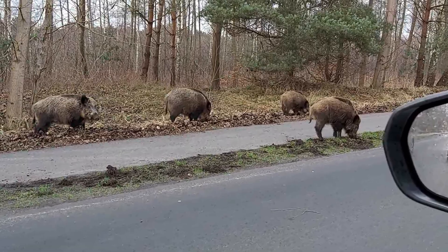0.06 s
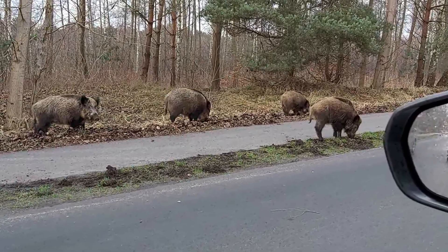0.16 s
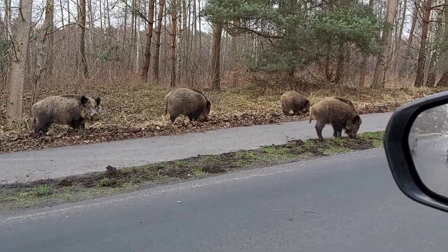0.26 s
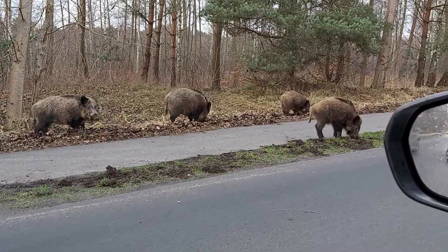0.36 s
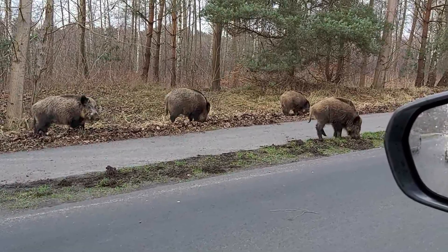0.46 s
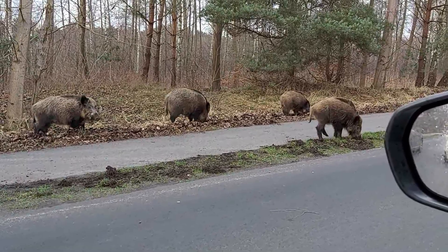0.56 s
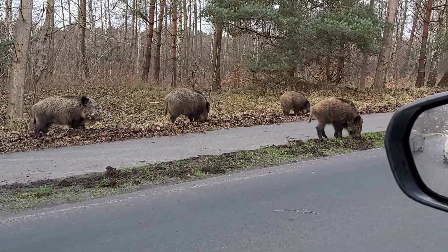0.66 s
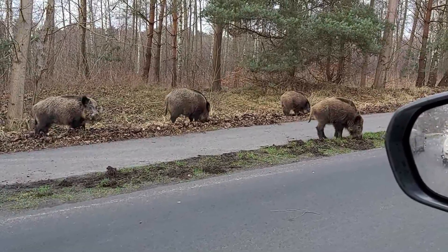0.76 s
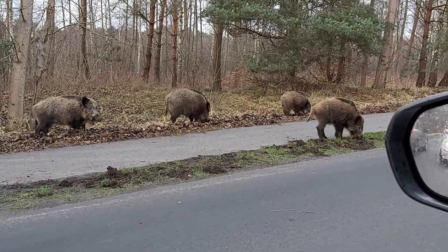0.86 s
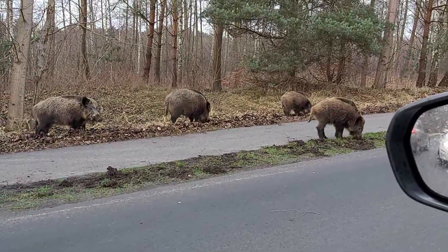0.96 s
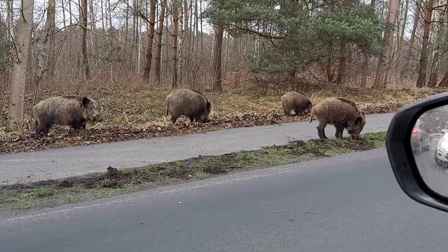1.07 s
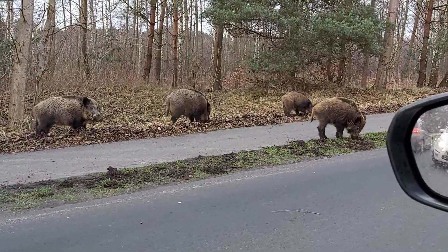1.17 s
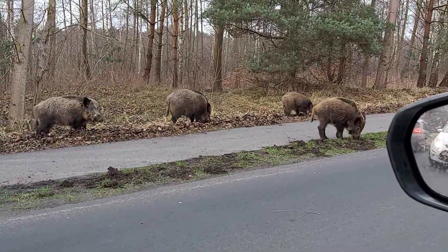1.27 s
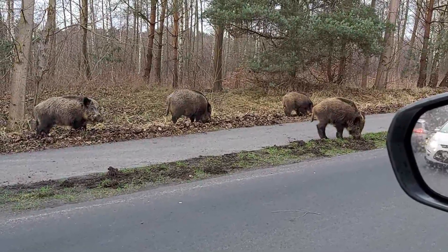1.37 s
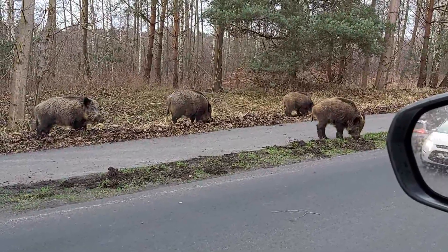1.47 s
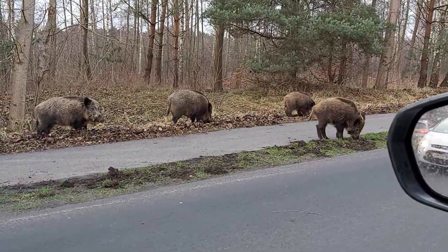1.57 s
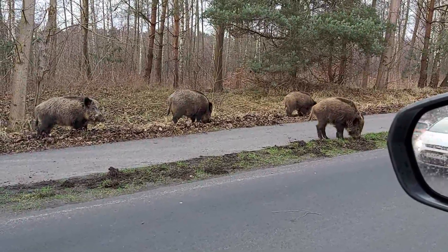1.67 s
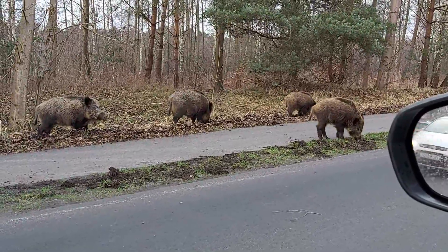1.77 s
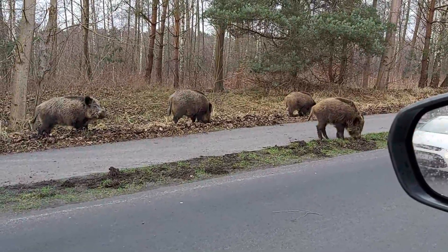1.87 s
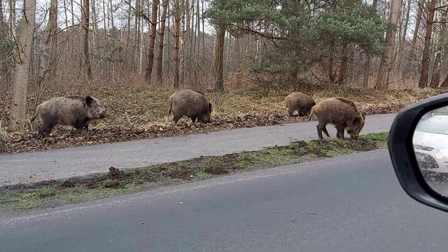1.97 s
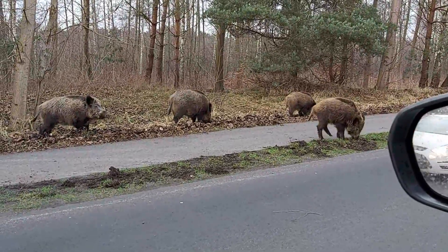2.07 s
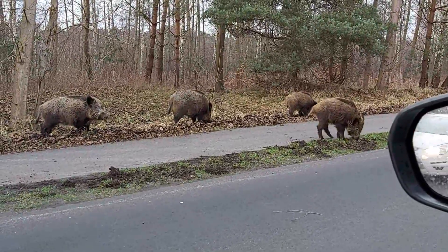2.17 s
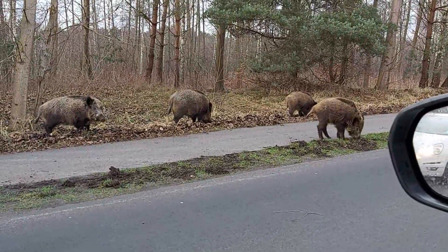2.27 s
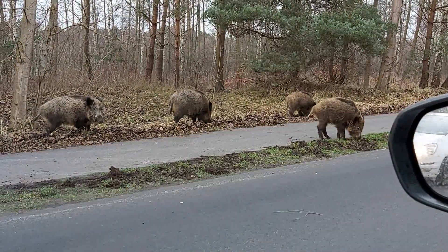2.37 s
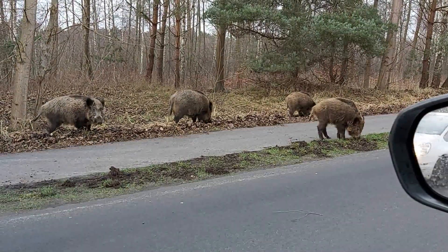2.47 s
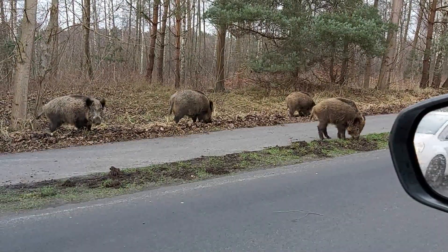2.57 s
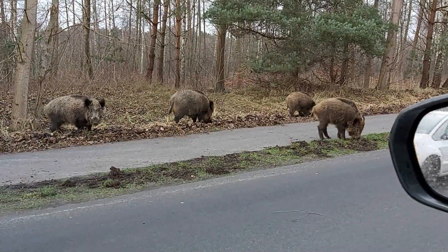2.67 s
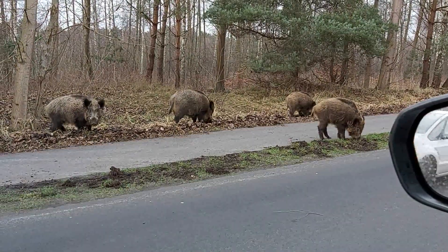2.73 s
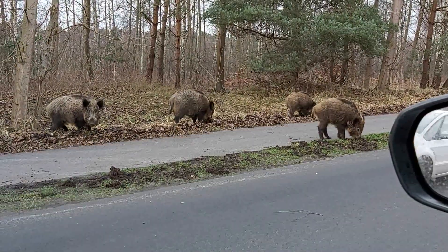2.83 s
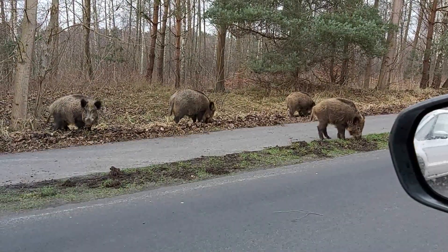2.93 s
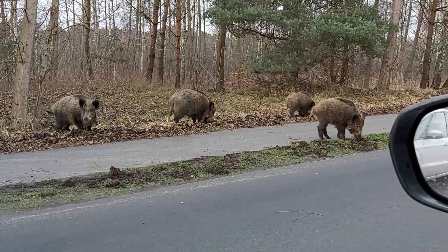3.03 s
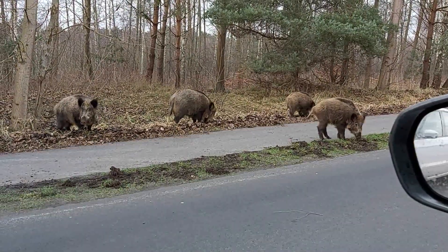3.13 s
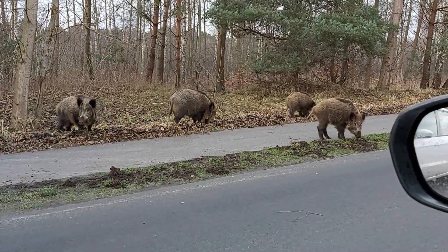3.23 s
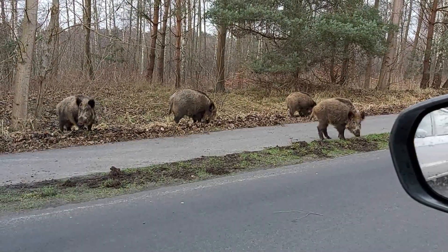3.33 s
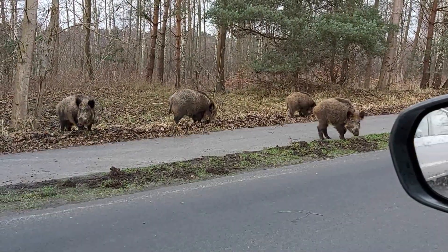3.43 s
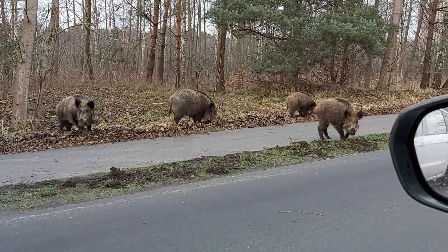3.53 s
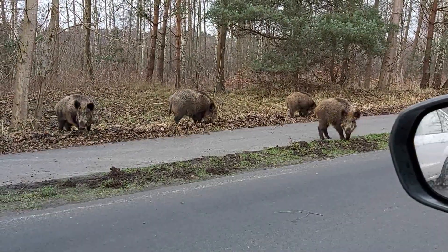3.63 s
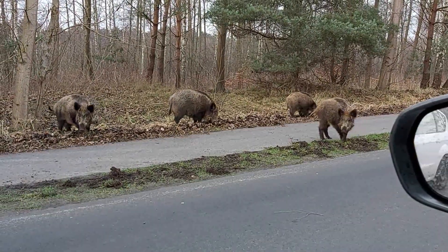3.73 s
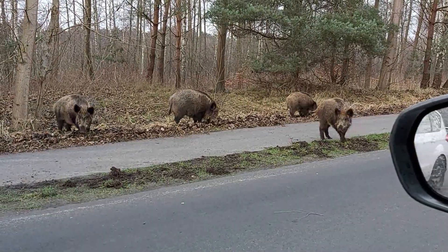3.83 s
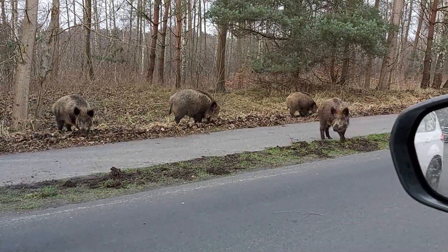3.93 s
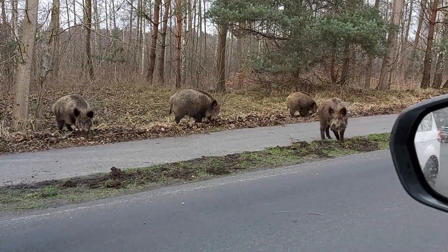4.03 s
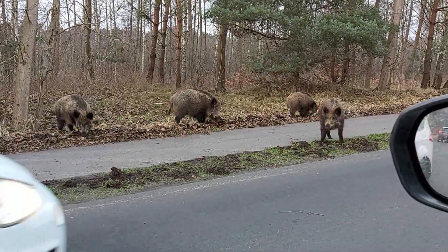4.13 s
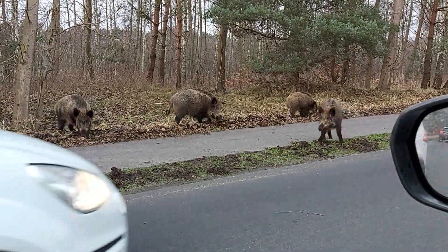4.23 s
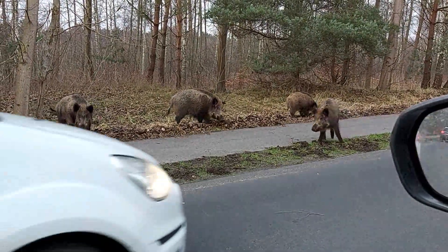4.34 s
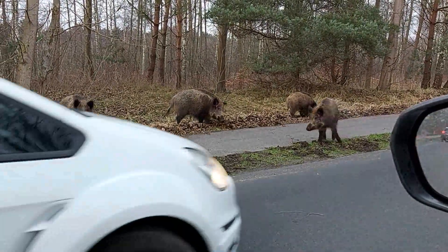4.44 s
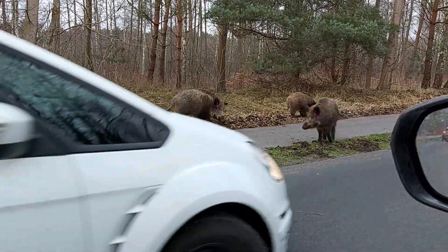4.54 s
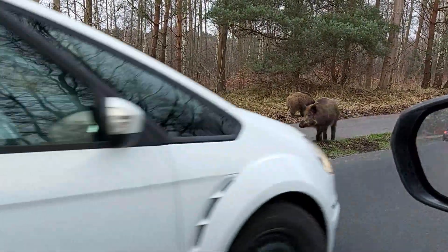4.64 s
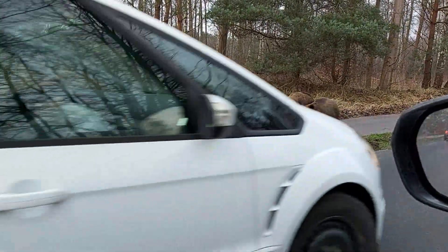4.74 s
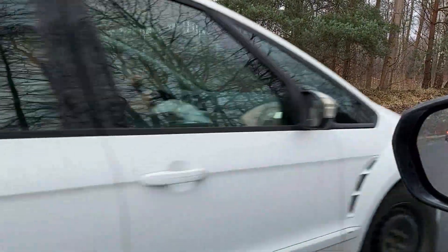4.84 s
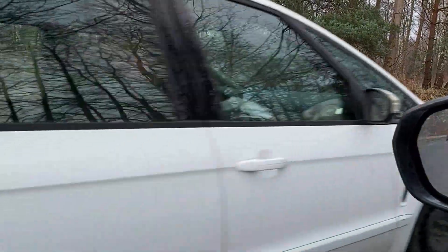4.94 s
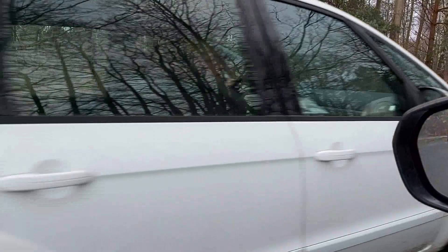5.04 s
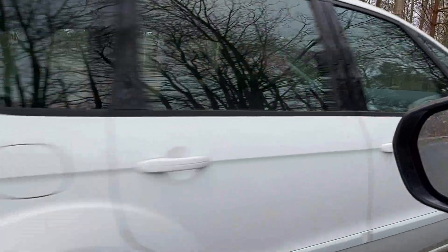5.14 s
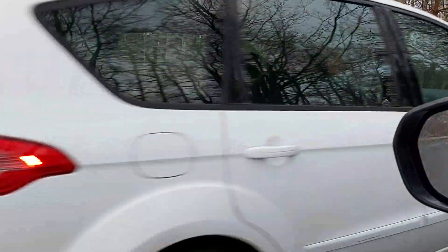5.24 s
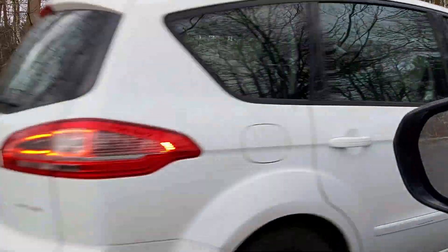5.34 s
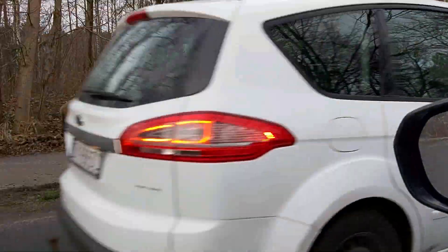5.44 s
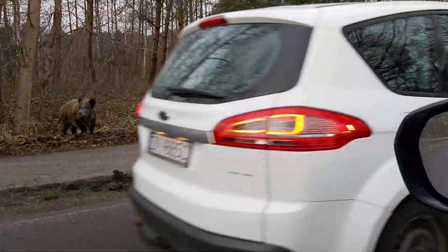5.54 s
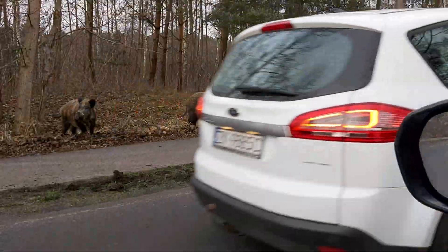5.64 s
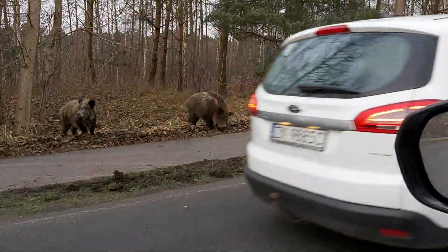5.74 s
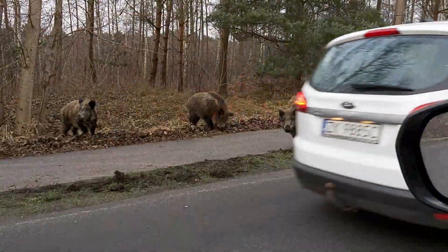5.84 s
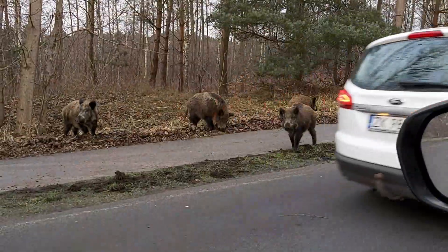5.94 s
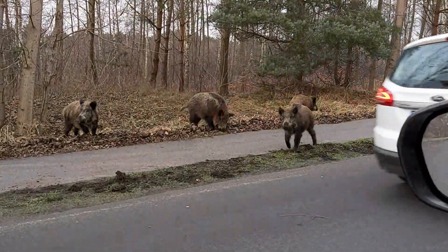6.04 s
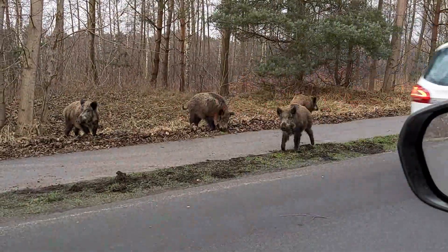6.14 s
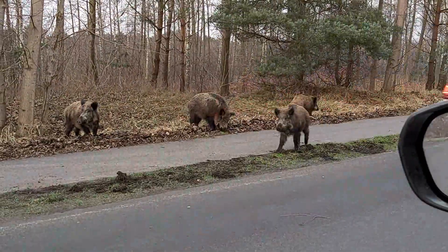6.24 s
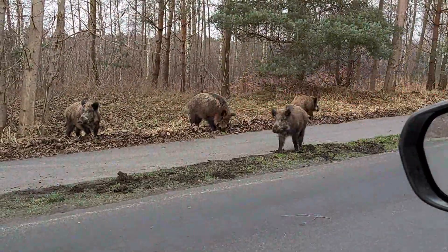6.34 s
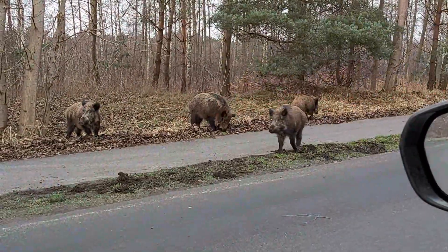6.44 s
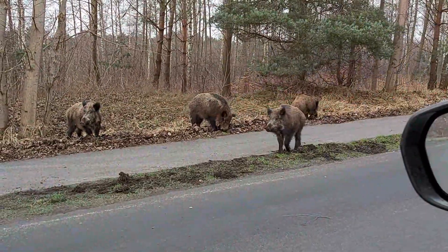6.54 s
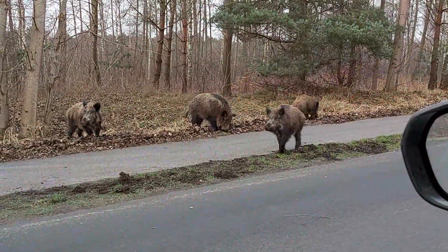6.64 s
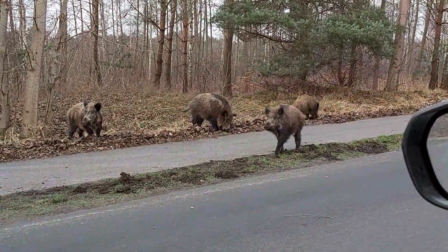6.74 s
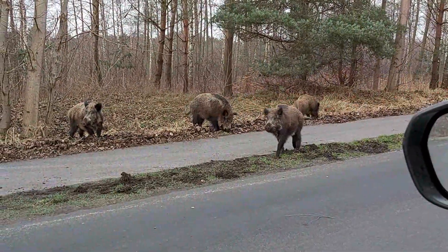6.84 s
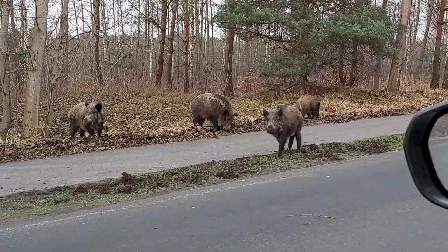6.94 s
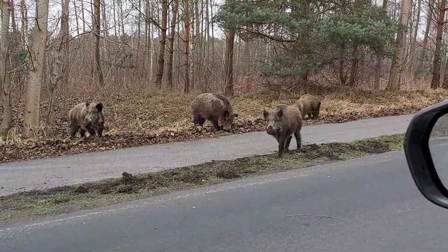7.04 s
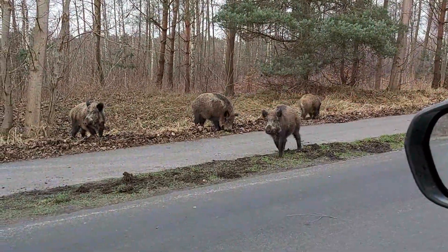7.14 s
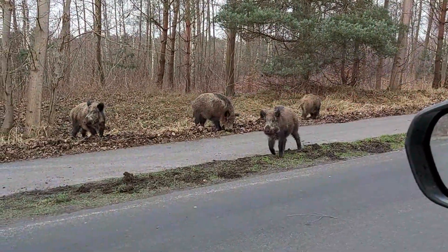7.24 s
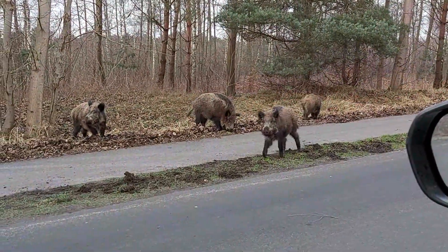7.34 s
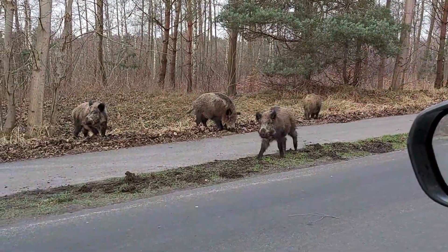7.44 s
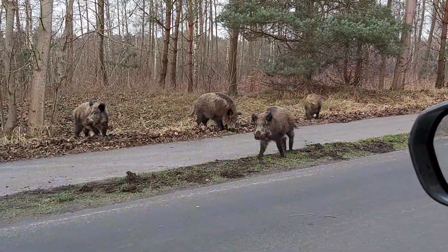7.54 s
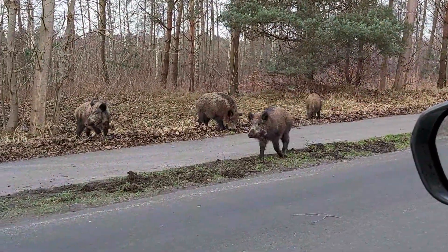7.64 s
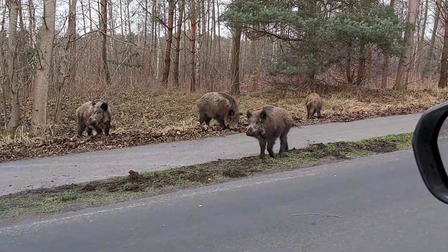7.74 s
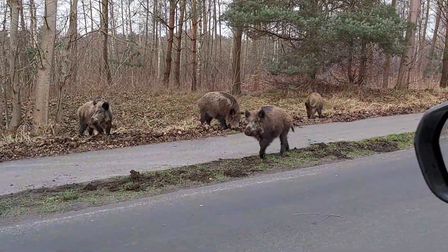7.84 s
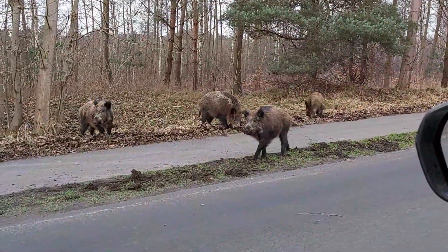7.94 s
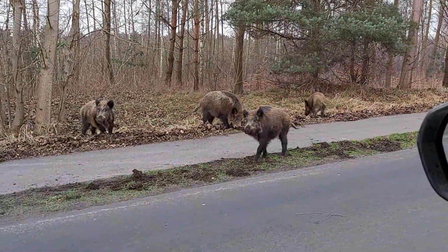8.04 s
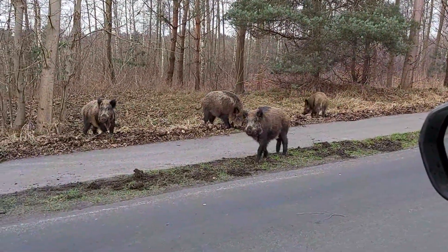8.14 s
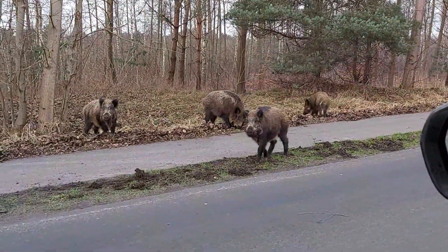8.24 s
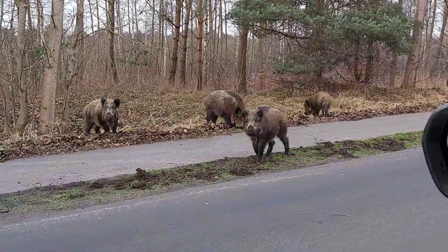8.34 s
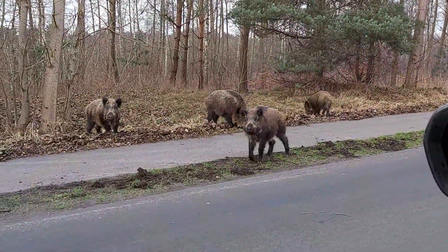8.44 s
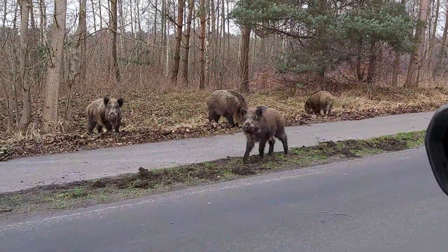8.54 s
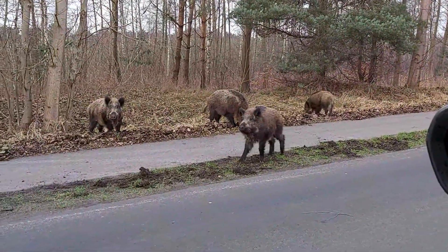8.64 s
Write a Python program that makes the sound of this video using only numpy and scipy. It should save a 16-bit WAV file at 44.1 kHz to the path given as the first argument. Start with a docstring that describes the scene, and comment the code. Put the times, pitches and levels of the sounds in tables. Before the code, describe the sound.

Inside a stopped car with its window open on a forest road, the engine idles in a low, fluttering hum. A diesel car approaches slowly from behind, booming and clattering, one cylinder knocking hard. It accelerates past at arm's length with roaring tyres and crunching grit, then fades with a thin turbo whistle, leaving the idle. Close stereo microphone at the window.

```python
"""A stopped car idles by a country road, heard through its open side window: steady hums and fluttering noise.
A four-cylinder diesel creeps up from behind. Each firing booms and clatters; one cylinder knocks hard.
First comes its engine bay, with short intake rasps, then the roar and crunch of tyres on the road.
It pulls past at arm's length, its echo sweeping in pitch, and a tyre bumps over a stone.
Its tail drives off with a faint turbo whistle. A few dry snaps come before and after it passes."""
import sys
import numpy as np
from scipy import signal
from scipy.fft import rfft, irfft
from scipy.io import wavfile
from scipy.ndimage import map_coordinates

SR = 44100
rng = np.random.default_rng(int(sys.argv[2]) if len(sys.argv) > 2 else 0)


def digitize_waveform(pressure):
    """Quantize a signal to 16-bit integers and store it at the path in sys.argv[1].

    Rows of a 2-D input are taken as channels; values are limited to [-1, 1].
    """
    field = np.atleast_2d(pressure).T
    bounded = np.clip(field, -1, 1)
    quanta = np.round(bounded * 32767).astype(np.int16)
    wavfile.write(sys.argv[1], SR, quanta)


N = 383669
TIME = np.arange(N) / SR  # seconds
BINS = np.fft.rfftfreq(N, 1 / SR)  # Hz


def amp(db):
    """Decibels to gain."""
    return 10 ** (np.asarray(db) / 20)


def curve(rows, axis=1):
    """One column of a table, joined by straight lines in time."""
    rows = np.array(rows)
    return np.interp(TIME, rows[:, 0], rows[:, axis])


def read(points):
    """A table over frequency, joined by straight lines on a log frequency axis."""
    hz, value = np.transpose(points)
    return np.interp(np.log(BINS + 1), np.log(hz + 1), value)


def drift(rate_hz):
    """A smooth random wander of rms about 1 that changes no faster than about rate_hz."""
    knots = rng.standard_normal(8192)
    return map_coordinates(knots, [TIME * 2 * rate_hz], order=2, mode="wrap")


# Balance of the two sides. Each row: frequency in Hz, left minus right in dB.
SIDE_BALANCE = [(100, -.7), (500, -1.2), (1000, -2.5), (1700, -1.2), (2800, 0), (5000, 0.1), (7500, 2),
                (10000, 5.5), (15000, 7.5)]
# How alike the two sides are, before each sound's own directness. Each row: frequency in Hz, likeness 0 to 1.
SIDE_LIKENESS = [(100, 0.65), (300, 0.66), (500, 0.37), (1000, 0.44), (1900, 0.5), (2800, 0.25),
                 (6000, 0.3), (9000, 0.14), (15000, .12)]


def noise(spectrum, lead_ms=0.36, left_db=0, direct=1):
    """Noise on both sides: the direct part reaches the left first if lead_ms is positive, the rest is diffuse."""
    a, b, c, d = rng.standard_normal((4, len(BINS)))
    same = np.clip(read(SIDE_LIKENESS) * direct, 0, .99)
    left = a + 1j * b
    # in the bass the cabin's air moves as a whole, so the lag fades out there
    lag_share = BINS ** 4 / (BINS ** 4 + 550. ** 4)
    lag = np.exp(-2j * np.pi * BINS * lead_ms / 1000 * lag_share)
    right = (same * left + np.sqrt(1 - same ** 2) * (c + 1j * d)) * lag
    tilt = amp(read(SIDE_BALANCE) + left_db * BINS ** 2 / (BINS ** 2 + 1000 ** 2))
    # fade out below the first and above the last frequency of the table
    low_skirt = 1 / (1 + (.8 * spectrum[0][0] / (BINS + 1)) ** 8)
    high_skirt = 1 / (1 + (BINS / spectrum[-1][0] / 1.3) ** 8)
    size = amp(read(spectrum)) * low_skirt * high_skirt * np.sqrt(N * SR / 2 / (1 + tilt ** 2))
    return irfft(np.array([left * tilt, right]) * size, N)


def bursts(cycles, decay):
    """A quick rise and a slower fall once in each cycle; decay is a share of the cycle."""
    age = (cycles % 1) / decay
    return age * np.exp(1 - age)


def throb(pulses, depth):
    """A gain of rms 1 that follows the pulses."""
    gain = 1 + depth * pulses
    return gain / np.sqrt(np.mean(gain ** 2))


def whistle(hz, width_hz):
    """A fuzzy tone of rms about 1 on a steady or moving pitch."""
    angle = 2 * np.pi * np.cumsum(hz * np.ones(N)) / SR
    return drift(width_hz) * np.cos(angle) + drift(width_hz) * np.sin(angle)


# The diesel's speed. Each row: time in seconds, firings a second.
FIRING_RATE = [(0, 35.2), (.55, 38.8), (.9, 41.8), (1.25, 37.1), (1.6, 34.3), (2.3, 33.2), (2.8, 34.2),
               (3.15, 37.6), (3.65, 38.2), (4, 44.8), (4.35, 45.4), (4.7, 51.3), (5, 56), (5.3, 57.4),
               (5.65, 62), (6, 57.9), (7.2, 54.5), (8.7, 52.2)]
# Strength of each cylinder's clatter: one number for each cylinder.
CYLINDER_STRENGTH = [0.76, 0.53, 0.52, 0.57]


def engine_firings():
    """Running count of engine cycles, and a pulse for each firing as strong as its cylinder."""
    cylinders = len(CYLINDER_STRENGTH)
    cycles = .42 + np.cumsum(curve(FIRING_RATE)) / cylinders / SR
    firings = cylinders * cycles
    strength = np.array(CYLINDER_STRENGTH)[firings.astype(int) % cylinders]
    return cycles, strength * bursts(firings, decay=0.35)


# it stays in one gear, so each firing moves it on by the same distance
METRES_PER_FIRING, ABREAST_S = .06, 4.64


def travel():
    """Metres that the diesel has gone beyond the window; negative while it is still behind."""
    metres = METRES_PER_FIRING * np.cumsum(curve(FIRING_RATE)) / SR
    return metres - metres[round(ABREAST_S * SR)]


# How each part of the diesel sweeps past the window. Each named row: metres beyond abreast where
# it is loudest, gain there in dB, half-width in metres, then the fall in dB per doubling of
# distance while coming and while going. The "overtones" gain is the level of their strongest lines.
PASSES = { "bay": (-2, -0.5, 2, 7, 16), "intake": (-2.5, -4.5, 1.7, 4.5, 3),
          "rumble": (0.42, 3.8, 2.1, 8.4, 12), "front tyre": (-1.0, 1, 1.0, 35, 9.5),
          "tyres": (0.5, -2, 2.5, 16.5, 17.5), "overtones": (2, -46.5, 2.5, 3, 13),
          "turbo hiss": (0.9, 5.8, 1.14, 24, 11.4), "tail": (1.52, .2, 2.45, 26, 9.1)}


def sweep(road, at_m, db, width_m, coming_db, going_db):
    """Gain of one part of the car: it falls with distance, at one rate while coming and another while going."""
    doublings = np.log2(np.hypot(1, (road - at_m) / width_m))
    return amp(db - doublings * np.where(road < at_m, coming_db, going_db))


# The boom from the grille and the underbody, before load and drone.
# Each row: multiple of the firing rate, then the five columns of PASSES with the level as rms dB.
BOOM_LINES = [(1, -1.4, -29.5, 0.89, 14, 8.7), (2, -2.5, -29.5, 0.64, 9.8, 6.4),
              (3, -1.7, -32, 0.81, 12, 6.4), (4, -0.5, -35.5, 1.19, 5.1, 10),
              (6, -1.9, -43.5, 1.6, 5.6, 6.9), (7, 1, -44.5, 2, 3.8, 8.5), (8, -3, -46.5, 0.99, 7.3, 9),
              (1, 0, -30, 0.5, 12, 5.3), (2, 0.2, -24, 0.9, 8.3, 4.48), (3, 0, -31, 0.36, 16, 6.2),
              (7, 0.5, -38, 0.29, 18, 10)]
# The throttle: a dab, a pause, then a long pull. Each row: time in seconds, load in dB.
THROTTLE_LOAD = [(0, 2), (.8, 3), (1.5, -6), (2.2, -13.5), (2.7, -5.5), (3.4, -0.5), (5.6, -0.5), (6.2, -3)]
BOOM_PER_LOAD = 0.15  # dB of boom for each dB of load
# resonance of the air intake, which faces forward
DRONE_HZ, DRONE_WIDTH_HZ, DRONE_DB = 155.4, 8.4, 12


def diesel_boom(cycles, road):
    """Each firing is a short dip of pressure; the intake drones on one pitch, uneven cylinders add weak half lines."""
    firings = 4 * cycles - .35
    rate, facing = curve(FIRING_RATE), np.clip(-road, 0, 1)
    boom = np.zeros(N)
    for order in sorted({round(row[0]) for row in BOOM_LINES}):
        paths = [path for multiple, *path in BOOM_LINES if round(multiple) == order]
        power = sum(sweep(road, *path) ** 2 for path in paths)
        unsteady = 1 + .04 * drift(4.)
        closeness = 1 / (1 + ((order * rate - DRONE_HZ) / DRONE_WIDTH_HZ) ** 2)
        drone = amp(DRONE_DB * facing * closeness)
        boom -= np.sqrt(power) * drone * unsteady * np.cos(2 * np.pi * order * firings)
    halves = range(9, 29)  # counted in halves of the firing rate
    overtones = np.zeros(N)
    for k in halves:
        unsteady = 1 + 0.24 * drift(2.5)
        strength = amp(-8. * (k % 2)) * (halves[0] / k) ** 0.63  # odd halves are weaker
        overtones += unsteady * strength * np.sin(np.pi * (k * firings + 2 * rng.random()))
    boom += sweep(road, *PASSES["overtones"]) * overtones
    load = amp(BOOM_PER_LOAD * curve(THROTTLE_LOAD))
    return np.sqrt(2) * boom * load * amp([[-.3], [.3]])


# Noise of the engine bay, the intake and the tail, before each one's sweep.
# Each row: frequency in Hz, level in dB per Hz.
BAY_NOISE = [(190, -58.5), (340, -58), (550, -72.5), (760, -76), (1020, -65.5), (1650, -76), (2250, -78),
             (2600, -82), (3000, -81.5), (3600, -80.5), (4800, -84), (6200, -86), (7600, -78.5),
             (9300, -94.5), (12000, -94), (15500, -97)]
INTAKE_NOISE = [(1200, -87), (1410, -67), (1650, -68.5), (1850, -70), (2200, -78)]
TAIL_NOISE = [(190, -80), (450, -66), (560, -68), (850, -62.5), (1250, -72), (1600, -70), (2200, -74.5),
              (2800, -78.5), (4500, -86.5), (6300, -85.5), (7600, -76), (8800, -89), (11300, -91.5),
              (15500, -94)]
# Intake resonances that whine under load and sing out just before the bonnet arrives.
# Each row: frequency in Hz, width in Hz, then the five columns of PASSES, before load and side balance.
INTAKE_WHINES = [(1434, 45, -1.4, -45, 0.42, 3.6, 8.4), (1572, 30, -2, -46.5, 0.56, 8.9, 10),
                 (1830, 30, -2, -49, 1, 4.6, 10)]
# A sizzle from the engine bay. Its one row: frequency in Hz, width in Hz,
# then the five columns of PASSES, before load.
BAY_SIZZLE = (6150, 229.5, -0.9, -45, 1.46, 9, 22)


def diesel_clatter(pulses, road):
    """Firings throw bursts of noise from the bay and the tail; bay and intake follow the throttle."""
    bay = noise(BAY_NOISE, lead_ms=0.52, left_db=1.5, direct=2.2)
    bay = bay * sweep(road, *PASSES["bay"]) * throb(pulses, depth=0.44)
    intake = noise(INTAKE_NOISE, lead_ms=0.59, left_db=-3.0, direct=1.27)
    intake = intake * sweep(road, *PASSES["intake"]) * amp(2. * drift(13.0))
    whines = sum(whistle(hz, width_hz) * sweep(road, *path) for hz, width_hz, *path in INTAKE_WHINES)
    whines = whines * amp([[-5.], [3.]])
    tail = noise(TAIL_NOISE, lead_ms=-0.24, left_db=7.5, direct=1.0)
    tail = tail * sweep(road, *PASSES["tail"]) * throb(pulses, depth=0.45)
    hz, width_hz, *path = BAY_SIZZLE
    sizzle = np.array([whistle(hz, width_hz) for side in range(2)]) * sweep(road, *path)
    return (bay + intake + whines + sizzle) * amp(curve(THROTTLE_LOAD)) + tail


# Knocks of the diesel. Each row: time in seconds, force in dB.
KNOCK_BLOWS = [(1.201, -23), (1.311, -23), (1.422, -21), (1.536, -20), (1.651, -28), (1.773, -25),
               (2.004, -21), (2.13, -25), (2.249, -23), (2.366, -21), (2.482, -22), (2.598, -18),
               (2.722, -20), (2.834, -15.5), (2.947, -12.5), (3.054, -7.5), (3.164, -8), (3.27, -8),
               (3.37, -7), (3.476, -7.5), (3.582, -6), (3.683, -4.5), (3.786, -10), (3.88, -3),
               (3.973, -3.5), (4.06, -2), (4.156, -6), (4.234, -4.5), (4.329, -3.5), (4.413, -2.5),
               (4.583, -2), (4.736, -3), (4.815, -8), (4.884, -0.5), (4.958, -4), (5.032, -0.5),
               (5.103, -.5), (5.168, -.5), (5.241, -5), (5.309, -2.5), (5.379, -2.5), (5.447, -3),
               (5.512, -5), (5.576, -9.5), (5.642, -7.5), (5.707, -10), (5.772, -8.5), (5.838, -10),
               (5.911, -13), (6.117, -14.5), (6.76, -25), (6.83, -24), (6.97, -17.5), (7.27, -23),
               (7.41, -24)]
# Metal contacts within one knock. Each row: time in ms from the knock's own time, strength.
KNOCK_CONTACTS = [(-7.5, 0.45), (-2.4, 1.08), (4, 0.55)]
# Colour of the knock from ahead and from beside, before force. Each row: frequency in Hz, level in dB per Hz.
KNOCK_AHEAD = [(900, -63), (1700, -61.5), (2200, -66.5), (2550, -60.5), (3050, -82), (3350, -61),
               (3570, -65.5), (3850, -71), (4400, -70.5), (6000, -72.5), (7400, -68.5), (9200, -102),
               (12000, -86), (15500, -98)]
KNOCK_BESIDE = [(700, -91), (1500, -57), (2100, -72), (2700, -59), (3200, -72), (5200, -75.5),
                (7400, -67.5), (9200, -82.5), (11400, -78), (15500, -90)]
CONTACT_SCATTER_MS, KNOCK_DECAY_S = 0.55, 0.012
KNOCK_TURN_AT_M, KNOCK_TURN_M = -0.18, 2  # where, and over what distance, it turns from ahead to the side
BLOCK_HZ, BLOCK_WIDTH_HZ, BLOCK_DB = 3610, 99, -40.5  # ring of the engine block, before force
BLOCK_HIDDEN_AT_M, BLOCK_HIDDEN_M = -1.1, 0.55  # where, and how gradually, the wing hides that ring


def diesel_knock(road):
    """One cylinder knocks much harder: a quick rattle of metal contacts, heard from ahead and then from the side."""
    power, age = np.zeros(N), np.arange(4096) / SR
    scatter = rng.standard_normal((len(KNOCK_BLOWS), len(KNOCK_CONTACTS)))
    for (s, db), slips in zip(KNOCK_BLOWS, scatter):
        for (ms, share), slip in zip(KNOCK_CONTACTS, slips):
            start = round((s + (ms + CONTACT_SCATTER_MS * slip) / 1000) * SR)
            power[start:][:len(age)] += (share * amp(db) * np.exp(-age / KNOCK_DECAY_S)) ** 2
    beside = np.clip(.5 + (road - KNOCK_TURN_AT_M) / KNOCK_TURN_M, 0, 1)
    beside = np.clip(beside + .2 * drift(9.), 0, 1)  # no two knocks have quite the same colour
    ring = whistle(BLOCK_HZ * (1 + .015 * drift(6.)), BLOCK_WIDTH_HZ) * amp(BLOCK_DB + 1.5 * drift(13.0))
    ring = ring / (1 + np.exp((road - BLOCK_HIDDEN_AT_M) / BLOCK_HIDDEN_M))
    ahead = noise(KNOCK_AHEAD, lead_ms=0.514, left_db=0.0, direct=0.86) + ring
    side = noise(KNOCK_BESIDE, lead_ms=-0.13, left_db=6.5)
    return (ahead * np.sqrt(1 - beside) + side * np.sqrt(beside)) * np.sqrt(power)


# Brief rasps of the intake as the throttle opens. Each row: middle in seconds, length in seconds,
# frequency in Hz, width in Hz, level in dB before the side balance.
RASP_GULPS = [(3.411, 0.026, 1830, 30, -38), (3.487, 0.022, 1420, 80, -36.5),
              (3.63, 0.2, 1634, 110.3, -39.5)]


def intake_rasps():
    """Gulps of air set the intake singing for a moment, louder on the right."""
    out = np.zeros(N)
    for s, length, hz, width_hz, db in RASP_GULPS:
        window = 1 / (1 + ((TIME - s) / (length / 2)) ** 8)
        out += whistle(hz, width_hz) * amp(db) * window
    return out * amp([[-4.], [2.5]])


GRIT_PER_S, GRIT_STRENGTH, GRIT_DECAY_S = 220, 1.0, .0013


def crunch():
    """A gain of rms 1 that jumps whenever a grain of grit snaps under the tread."""
    snaps = (rng.random(N) < GRIT_PER_S / SR) * np.minimum(rng.exponential(1, N), 3)
    keep = np.exp(-1 / (GRIT_DECAY_S * SR))
    power = 1 + GRIT_STRENGTH * signal.lfilter([1], [1, -keep], snaps)
    return np.sqrt(power / power.mean())


# The front tyre's roar, thrown forward from where tread meets road, and the rolling of all the tyres,
# before each one's sweep. Each row: frequency in Hz, level in dB per Hz.
FRONT_TYRE_ROAR = [(380, -80), (470, -66.5), (620, -59.5), (800, -69), (1030, -61.5), (1250, -66),
                   (1480, -64), (1750, -83), (2300, -76), (3000, -77)]
TYRE_ROLL = [(190, -63), (450, -63.5), (800, -62), (1050, -61.5), (1250, -65), (1520, -59), (2200, -72),
             (2700, -71.5), (3200, -73.5), (6200, -71.5), (7600, -75), (9300, -84), (11600, -77.5),
             (15500, -83)]
# Hums of the tyre tread. Each row: frequency in Hz, width in Hz, then the five columns of PASSES.
TREAD_HUMS = [(551.5, 42, 1.7, -35, 1.8, 21, 11.6), (595, 24, 1.9, -46.5, 0.76, 19, 4.3),
              (660, 22, 4.4, -46.5, 0.85, 14, 2.9)]


def tyres(pulses, road):
    """The front tyre roars first; then all four crunch on grit, with the engine's throb in their noise."""
    front = noise(FRONT_TYRE_ROAR, lead_ms=0.4, left_db=7.0, direct=0.82) * sweep(road, *PASSES["front tyre"])
    grit = crunch() * amp(.6 * drift(12.))
    roll = noise(TYRE_ROLL, lead_ms=0.399, left_db=0.5, direct=0.45) * sweep(road, *PASSES["tyres"])
    # the rolling noise pulses with each firing of the engine
    roll = roll * grit * throb(pulses, depth=0.3)
    hums = sum(whistle(hz, width_hz) * sweep(road, *path) for hz, width_hz, *path in TREAD_HUMS)
    return front + roll + hums


# the bounce off the road and the cars' flanks is longest when the cars are side by side
BOUNCE_FAR_MS, BOUNCE_EXTRA_MS, BOUNCE_AT_M, BOUNCE_WIDTH_M = 0.492, 2.342, 0.53, 1.76


def bounced(x, road, gain):
    """Adds an echo whose path changes as the car moves: a comb that sweeps down and up again."""
    delay_ms = BOUNCE_FAR_MS + BOUNCE_EXTRA_MS / np.hypot(1, (road - BOUNCE_AT_M) / BOUNCE_WIDTH_M)
    late = np.arange(N) - delay_ms * SR / 1000
    echo = np.array([np.interp(late, np.arange(N), side) for side in x])
    return (x + gain * echo) / np.sqrt(1 + gain ** 2)


# A tyre bumps over a stone. Its one row: start in seconds, level in dB before the decay,
# frequency in Hz, decay in seconds.
STONE_BUMP = (5.6111, -22, 660, .0026)


def bump():
    """A stone under the tread makes the tyre ring for two or three cycles."""
    s, db, hz, decay_s = STONE_BUMP
    age = np.maximum(TIME - s, 0)
    return -amp(db) * np.exp(-age / decay_s) * np.sin(2 * np.pi * hz * age)


# Hiss of the turbocharger as the front wheel arch goes by, before its sweep.
# Each row: frequency in Hz, level in dB per Hz.
ARCH_HISS = [(9800, -103), (10800, -82.5), (11400, -80), (12300, -100), (13500, -105)]
# The turbo whistle as it spools up, fades and briefly returns.
# Each row: time in seconds, pitch in Hz, level in dB before the side balance.
TURBO_WHISTLE = [(4.8, 9330, -92), (5.3, 9900, -72), (5.85, 10950, -59), (6.15, 11200, -67),
                 (6.55, 11380, -79), (6.86, 11150, -83), (6.98, 10880, -76), (7.45, 10820, -81),
                 (7.9, 10700, -95)]


def turbo(road):
    """A band of hiss from close by, then a thin whistle as the car draws away."""
    hiss = noise(ARCH_HISS, left_db=14.0) * sweep(road, *PASSES["turbo hiss"])
    thin = whistle(curve(TURBO_WHISTLE), width_hz=110.0) * amp(curve(TURBO_WHISTLE, axis=2))
    return hiss + thin * amp([[1.5], [-7.]])


IDLE_HZ = 27.29  # crankshaft turns a second, before a slight wander
# Hum of the idling engine. Each row: multiple of its crankshaft speed, rms level in dB
# before the slow change in level and the side balance.
IDLE_HUM = [(1, -49.5), (2, -35.5), (3, -41), (4, -43.5), (5, -52.5), (6, -49.5), (7, -51), (8, -53.5),
            (9, -52), (10, -52), (11, -56), (12, -65.5), (13, -62)]
# Slow rise and fall in level of the low hum, partly where it beats against the diesel's.
# Each row: time in seconds, gain in dB.
IDLE_HUM_LEVEL = [(0, 0), (.8, 0), (2, -5), (2.7, 0.5), (4, -2.5), (7.5, 1.5), (8.1, -3)]
# Noise of the idling engine. Each row: frequency in Hz, level in dB per Hz.
IDLE_ENGINE_NOISE = [(190, -61), (330, -66), (450, -72), (580, -68.5), (760, -74), (1000, -76.5),
                     (1220, -77.5), (1600, -79), (2200, -90.5), (2600, -88), (3100, -95), (3700, -95.5),
                     (5000, -96.5), (7600, -95.5), (9300, -111), (11300, -108), (15500, -121)]


def idling_car():
    """Crankshaft orders that slowly rise and fall in level, and engine noise that flutters with each turn."""
    turns = np.cumsum(IDLE_HZ * (1 + .0017 * drift(3.))) / SR
    hum = np.zeros(N)
    for order, db in IDLE_HUM:
        unsteady = 1 + .02 * order * drift(1.2)
        hum += np.sqrt(2) * amp(db) * unsteady * np.sin(2 * np.pi * (order * turns + rng.random()))
    hum = hum * amp(curve(IDLE_HUM_LEVEL)) * amp([[-1.7], [1.4]])
    flutter = throb(bursts(turns, decay=.22), depth=.22)
    return hum + noise(IDLE_ENGINE_NOISE, lead_ms=0.484, left_db=0.5) * flutter


# Low rumble in the cabin, before its gain. Each row: frequency in Hz, level in dB per Hz.
CABIN_RUMBLE = [(15, -91), (28, -80), (40, -58.5), (75, -56), (140, -58.5), (180, -66.5), (200, -65),
                (300, -130)]
CABIN_DB = -2  # gain of the part that is always there


def cabin_rumble(road):
    """Low noise that both cars raise in the cabin: a steady part, and one that grows as the diesel passes."""
    return noise(CABIN_RUMBLE) * np.hypot(amp(CABIN_DB), sweep(road, *PASSES["rumble"]))


# Small snaps of trim and grit. Each row: start in seconds, peak in dB, centre in Hz, width in octaves.
SNAPS = [(1.048, -37, 3100, 2.5), (1.773, -43, 2520, .3), (7.0064, -41, 3100, 2.2),
         (7.7014, -44, 3100, 2.5)]


def ticks():
    """Short dry snaps: fast-fading noise, each in its own band."""
    out = np.zeros((2, N))
    age = np.arange(2048) / SR
    for s, db, hz, octaves in SNAPS:
        edges = np.minimum(hz * 2 ** (np.array([-.5, .5]) * octaves), .45 * SR)
        band = signal.butter(3, edges, "bandpass", fs=SR, output="sos")
        snap = signal.sosfilt(band, rng.standard_normal((2, len(age))) * np.exp(-age / 0.0056))
        out[:, round(s * SR):][:, :len(age)] += amp(db) * snap / abs(snap).max()
    return out


def scene():
    """The passing diesel, the idling car, the cabin's rumble and the small snaps."""
    road = travel()
    cycles, pulses = engine_firings()
    passing = bounced(diesel_clatter(pulses, road) + tyres(pulses, road), road, gain=.27)
    diesel = diesel_boom(cycles, road) + diesel_knock(road) + passing
    diesel = diesel + intake_rasps() + turbo(road) + bump()
    return diesel + idling_car() + cabin_rumble(road) + ticks()


# Reflections from the window frame: one list for the left and one for the right.
# Each row: delay in ms, gain before the bass is taken out.
FRAME_ECHOES = [
    [(.45, 0.054), (1.66, 0.076), (3.1, 0.012)],
    [(.59, 0.14), (1.25, 0.018), (2.6, 0.022)],
]
# Colour of the window opening. Each row: frequency in Hz, gain in dB.
OPENING_COLOUR = [(560, 0), (700, -1.3), (800, 0), (980, 0.5), (1100, 0.7), (1290, -1), (1500, 0.1),
                  (2000, 0), (2300, -0.3), (2700, 0.5), (3120, -1.5), (3550, 2.5), (3950, 0.5), (4250, 1.5),
                  (4800, -1), (5250, 0), (5650, 0.5), (6200, 0), (6750, -0.5), (7400, 1), (8400, -1.5),
                  (9000, -1)]
EDGE_HZ = 15800  # upper limit of the treble


def record(dry):
    """The window opening and its frame colour each side; then the highest treble is cut."""
    # long waves bend round the frame and are not thrown back
    too_long = 1 + (300 / (BINS + 1)) ** 2
    colour = []
    for side in FRAME_ECHOES:
        echoes = sum(gain * np.exp(-2j * np.pi * BINS * ms / 1000) for ms, gain in side)
        colour.append(1 + echoes / too_long)
    heard = irfft(rfft(dry) * np.array(colour) * amp(read(OPENING_COLOUR)), N)
    treble_cut = signal.firwin(511, EDGE_HZ, window=("kaiser", 9), fs=SR)
    return signal.oaconvolve(heard, treble_cut[None], "same")


dry = scene()
out = record(dry)
digitize_waveform(out)
```